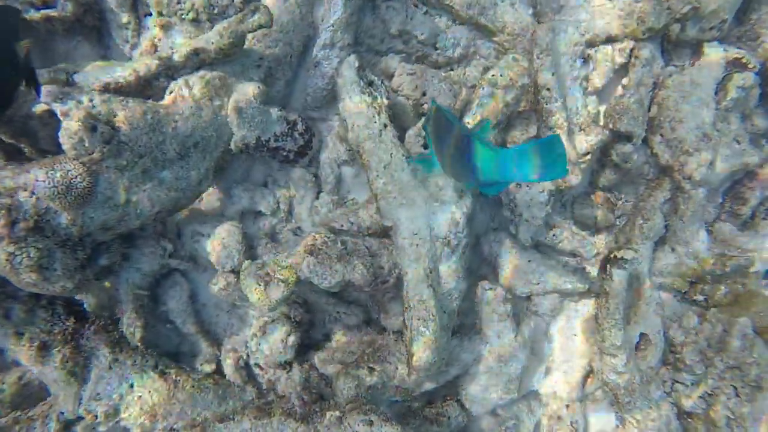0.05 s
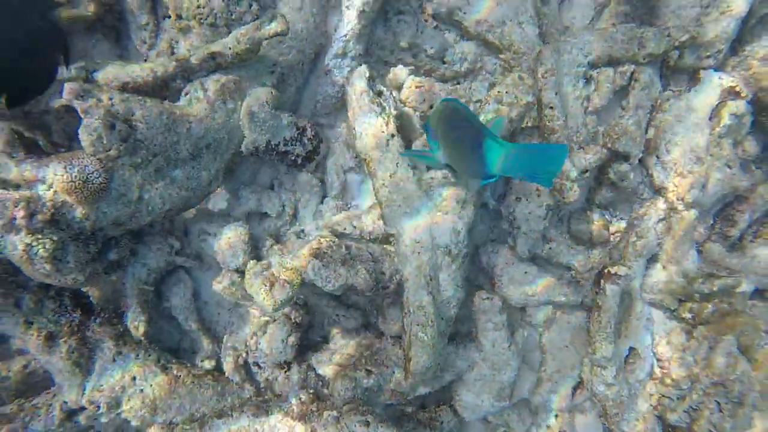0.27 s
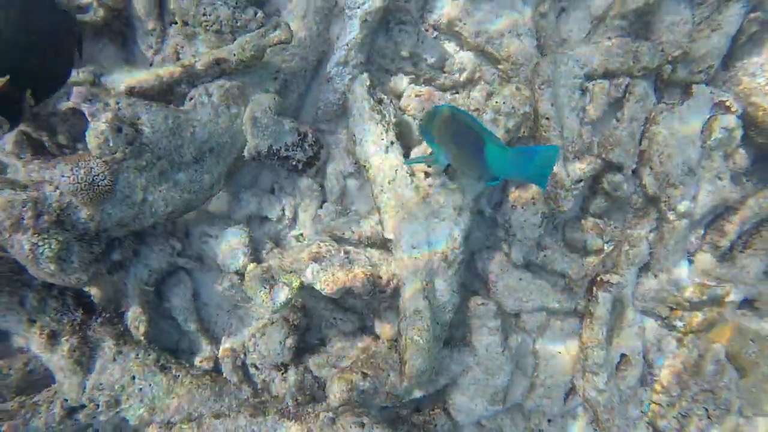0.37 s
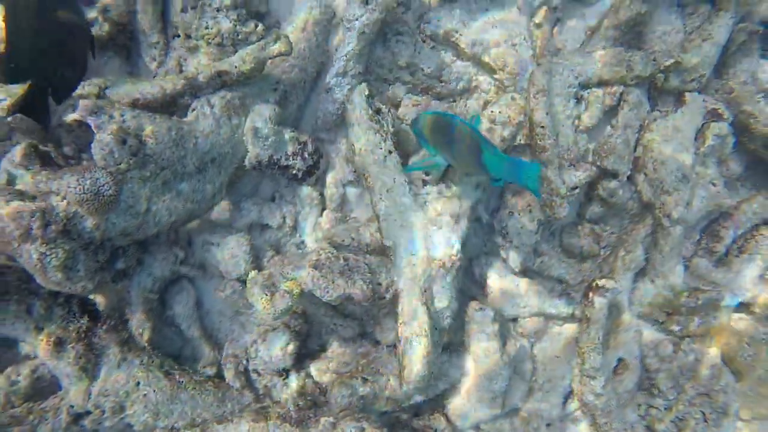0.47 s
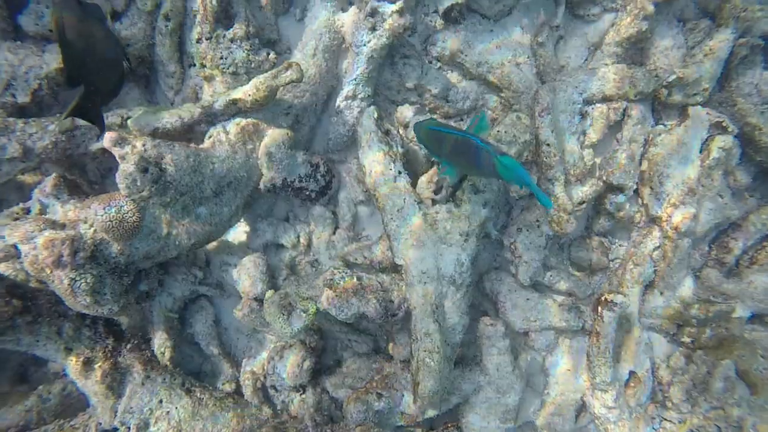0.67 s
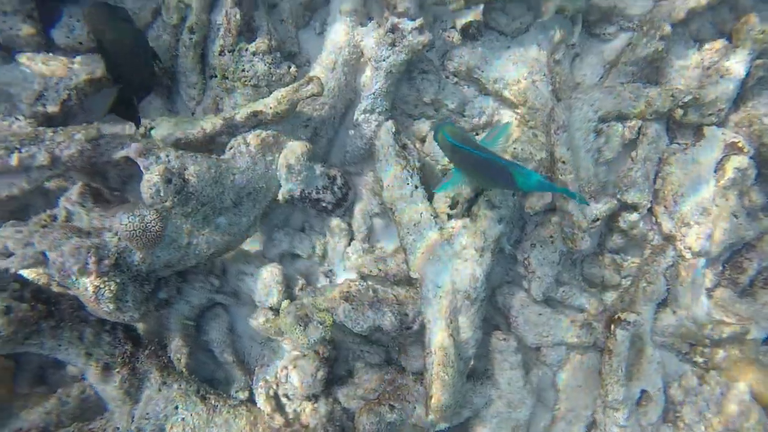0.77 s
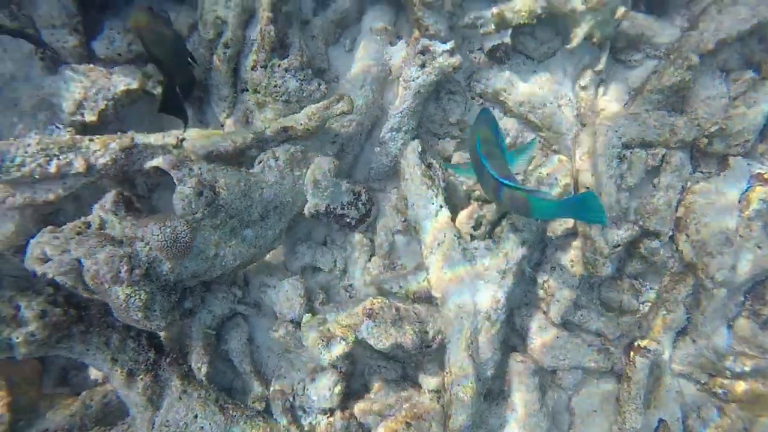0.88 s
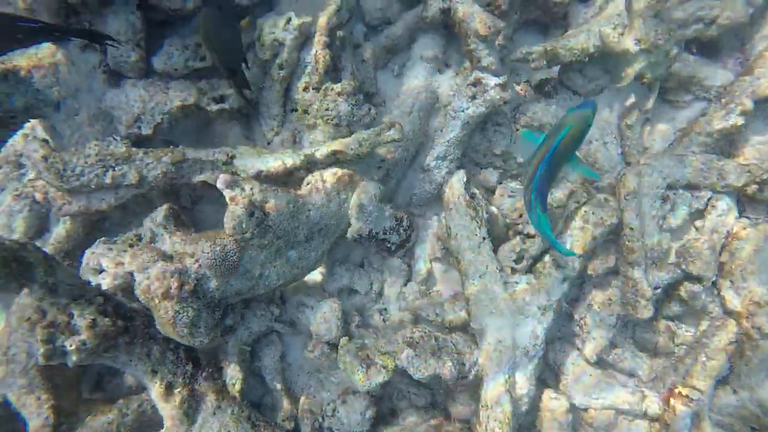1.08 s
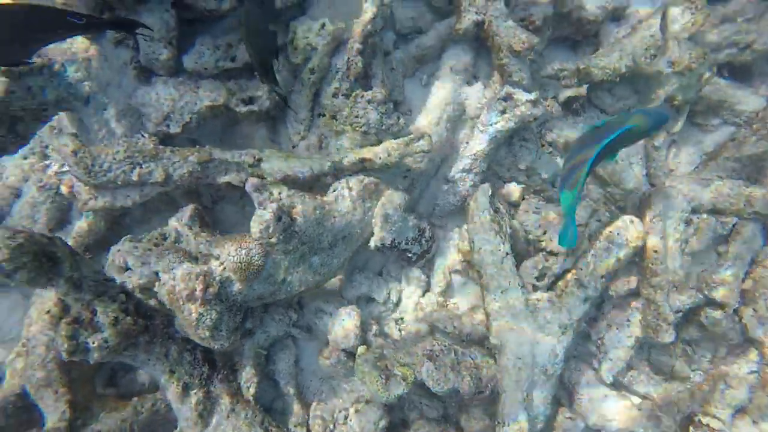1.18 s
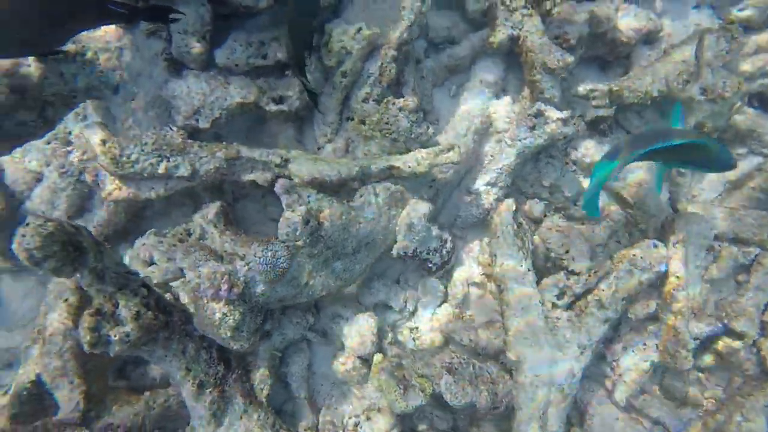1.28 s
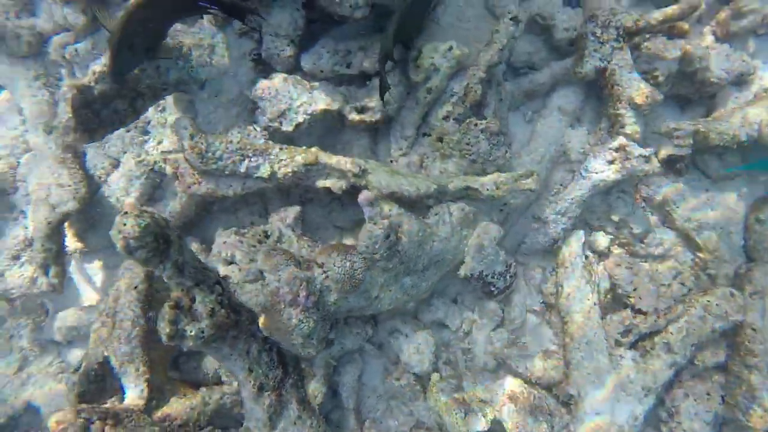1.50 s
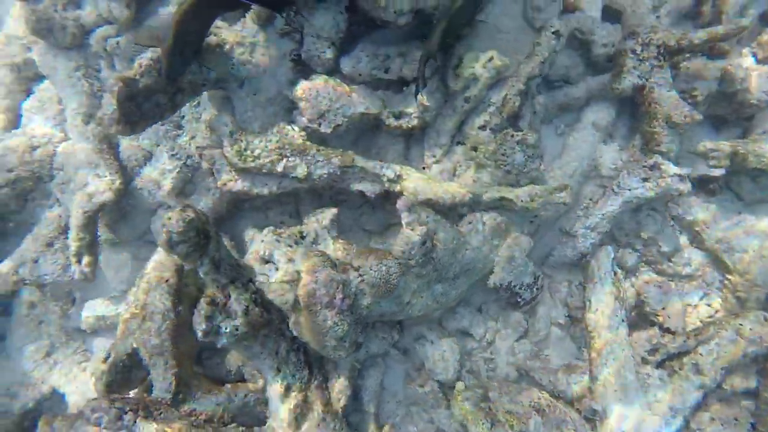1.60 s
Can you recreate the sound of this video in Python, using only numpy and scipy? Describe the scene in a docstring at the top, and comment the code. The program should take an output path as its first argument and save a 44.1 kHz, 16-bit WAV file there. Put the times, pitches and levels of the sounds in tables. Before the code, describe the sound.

A fish bites coral underwater with a quick, gritty run of cracks and scraping from about 0.1 to 0.3 seconds, sounding close and slightly hollow. At about 0.65 seconds a swirl of water bumps the camera housing with a low thump. A second, softer crunch comes around 1.3 to 1.4 seconds. Scattered small snaps, faint shrimp crackle and a soft water rumble continue throughout.

```python
"""Soft water rumble and the crackle of far shrimp, heard under water through a camera housing.
Nearer shrimp and grazing fish snap, each with a short ring. A parrotfish bites coral twice:
its beak scrapes off grains, and quick runs of brittle cracks ring the housing's hollow resonances.
Between the bites one swirl of water bumps the housing."""
import sys
import numpy as np
from scipy import signal
from scipy.fft import rfft, irfft
from scipy.io import wavfile

SR = 44100
rng = np.random.default_rng(int(sys.argv[2]) if len(sys.argv) > 2 else 0)


def unload_wav(signal):
    """Save mono or channel-first audio to the path in sys.argv[1] as 16-bit WAV at rate SR, clipped to [-1, 1]."""
    wavfile.write(
        sys.argv[1],
        SR,
        np.round(np.clip(np.atleast_2d(signal).T, -1, 1) * 32767).astype(np.int16),
    )


N = 72765
TAPS = 4096
HZ = np.fft.rfftfreq(TAPS, 1 / SR)
AGE_S = np.arange(TAPS) / SR

# water rumble and distant wash: (frequency [Hz], relative density [dB])
WATER_SPECTRUM = [(15, -18.5), (30, -2), (40, -2), (50, 5), (62, -9), (85, -9), (125, -14.5), (180, -11),
                  (260, -16), (420, -21.5), (650, -31), (1100, -40), (2000, -50), (16000, -62)]
# far shrimp: (frequency [Hz], relative density [dB])
REEF_SPECTRUM = [(100, -12.5), (400, 3.5), (680, 7.5), (1150, -3), (1450, 0), (1750, 4.5), (2250, -2),
                 (2800, -0.5), (3300, -5.5), (4200, -5.5), (5000, -12), (7000, -9.5), (10000, -18.5),
                 (13000, -18.5), (16000, -35)]
# thud, knock, clack, tick and fizz bands: (edge [Hz])
CLICK_BAND_EDGES_HZ = [110, 400, 1100, 2250, 5000, 16000]
# housing resonances: (frequency [Hz], half width [Hz], gain [dB])
HOUSING_MODES = [(240, 83, 4.5), (510, 89, -5), (620, 62, 3), (1649, 135, -8.5), (1900, 210, -17),
                 (2600, 230, -14.5), (2882, 102, -14), (3530, 80, -18.5), (4010, 280, -19.5),
                 (4660, 50, -34), (5100, 320, -27.5), (6020, 250, -37)]
# path through the housing wall: (frequency [Hz], gain [dB])
WALL_GAIN = [(30, -50), (120, -10), (400, -4.5), (780, -6), (1100, -54), (2300, -32.5), (5000, -39),
             (8000, -39.5), (12000, -49), (16000, -59)]
# near snaps: (time [s], ring [Hz], thud [dB], knock [dB], clack [dB], tick [dB], fizz [dB])
NEAR_SNAPS = [(0.0445, 1610, -48, -60, -48, -67, -73), (0.087, 2920, -48, -52, -59, -51, -74),
              (0.402, 650, -49.5, -45, -61, -78, -68), (0.4248, 2200, -48, -60, -46, -50, -53),
              (0.4881, 1560, -64, -50, -39, -49, -73), (0.498, 940, -59, -49, -56, -57, -67.5),
              (0.543, 1770, -82, -62, -52, -59, -82), (0.5527, 1950, -73, -67, -52, -60, -83),
              (0.574, 1900, -58, -69, -49, -60, -98), (0.59, 1900, -66, -66, -51, -57, -79),
              (0.642, 1335, -44, -53, -43, -53.5, -89), (0.6802, 1800, -45, -48, -45.5, -60, -64.5),
              (0.7901, 2820, -69, -68, -55.5, -57, -66), (0.812, 2800, -56.5, -79, -51.5, -49, -66),
              (0.8325, 3420, -70, -67, -54, -59, -63), (0.869, 900, -61, -53, -57, -62, -64),
              (0.923, 1960, -61, -76, -55.5, -60.5, -63.5), (0.9895, 2850, -54, -61, -54.5, -54.5, -72),
              (1.0005, 1730, -61, -50, -52.5, -65, -75), (1.0267, 1900, -57, -71, -51, -65, -68),
              (1.123, 1020, -59, -49.5, -45, -66, -68), (1.429, 9000, -72, -77, -79, -82, -70),
              (1.461, 10100, -67, -62, -69, -67, -70), (1.48, 2770, -51, -54.5, -62, -50, -64),
              (1.4897, 6160, -55.5, -46, -48.5, -45, -44.5), (1.5191, 1900, -54.5, -61, -49.5, -55.5, -72),
              (1.577, 1880, -71, -55, -50, -71, -78), (1.621, 5600, -81, -54, -59, -58, -58)]
# coral cracks: (time [s], knock lag [s], thud [dB], knock [dB], clack [dB], tick [dB], fizz [dB])
CORAL_CRACKS = [(0.0944, 0.0013, -38, -39, -51, -47.5, -61), (0.1032, 0.00028, -35.5, -56, -64, -72, -72),
                (0.1137, 0.001, -47, -45, -43.5, -50.5, -62), (0.1297, 0.00079, -44, -47.5, -48, -62, -81),
                (0.1352, 0.0013, -35.5, -35, -41.5, -45, -60),
                (0.1387, 0.00095, -19, -19.5, -29.5, -35.5, -41.5),
                (0.1447, 0.00015, -39, -32.5, -41, -34, -43), (0.169, 0.00056, -62, -43, -52, -45.5, -77),
                (0.174, 0.00059, -41.5, -34, -58, -70, -80),
                (0.2087, 0.00108, -43.5, -29.5, -35.5, -57, -51),
                (0.2179, 0.00034, -69, -51, -51, -41.5, -52),
                (0.229, 0.00108, -39.5, -30.5, -46.5, -53.5, -53.5),
                (0.272, 0.00042, -59, -47.5, -59.5, -64, -66), (1.2106, 0.00044, -47, -45, -54, -68, -82),
                (1.2665, 0.00032, -49.5, -45, -84, -58.5, -62.5),
                (1.3107, 0.00043, -55, -44, -49.5, -55, -70), (1.3187, 0.00029, -45, -53, -44, -52.5, -69),
                (1.339, 0.00088, -43, -33, -44.5, -71, -71),
                (1.3451, 0.00068, -36.5, -32.5, -53, -50, -57.5), (1.351, 0.00035, -40, -39, -45, -65, -59),
                (1.358, 0.00058, -52, -33.5, -44, -50, -50.5),
                (1.3692, 0.0011, -44.5, -33, -39.5, -50.5, -56.5),
                (1.3758, 0.0004, -44, -36, -47, -60, -72)]
# beak sliding on coral: (centre [s], half length [s], level [dB])
BEAK_SCRAPES = [(0.132, 0.024, -48), (0.216, 0.036, -46.5), (1.331, 0.047, -50.5)]
# churn in the swirl: (frequency [Hz], relative density [dB])
CHURN_SPECTRUM = [(30, 1), (90, -2), (160, 2), (300, -17), (600, -10.5), (1500, -31), (5000, -70)]
# ring of the bumped housing: (frequency [Hz], level [dB], t60 [s])
BUMP_MODES = [(97, -36.5, 0.18), (150, -30.5, .07), (276, -33, 0.14), (518, -32.5, 0.059),
              (950, -24.5, 0.014), (1266, -23, 0.015)]


def amp(db):
    """Decibels to gain."""
    return 10 ** (np.asarray(db) / 20)


def unit_rms(x):
    """Scale to an rms of one."""
    return x / np.sqrt(np.mean(x ** 2) + 1e-20)


def curve_gain(points, hz):
    """Gain of a (frequency [Hz], level [dB]) curve, log-frequency axis."""
    points_hz, db = np.transpose(points)
    return amp(np.interp(np.log(hz + 1), np.log(points_hz + 1), db))


def add(mix, time_s, sound):
    """Mix a sound in at time_s."""
    part = mix[max(round(time_s * SR), 0):][:len(sound)]
    part += sound[:len(part)]


def min_phase(gain):
    """Spectrum of the sharpest causal click with these gains."""
    log_gain = np.log(np.maximum(np.r_[gain, gain[-2:0:-1]], 1e-7))
    return np.exp(np.conj(signal.hilbert(log_gain)))[:len(gain)]


def noise(spectrum):
    """Steady shaped noise, unit rms."""
    gain = curve_gain(spectrum, np.fft.rfftfreq(N, 1 / SR))
    return unit_rms(irfft(rfft(rng.standard_normal(N)) * gain, N))


def water(level_db=-50.5, lump_db=1.5, lump_s=0.027):
    """Moving water rumbles in uneven lumps."""
    window = np.hanning(int(2 * lump_s * SR))
    lumps = unit_rms(signal.fftconvolve(rng.standard_normal(N), window, "same"))
    return amp(level_db) * unit_rms(noise(WATER_SPECTRUM) * amp(lump_db * lumps))


def far_shrimp(level_db=-56.5, wash_db=-59, snaps_per_s=700, spread_db=5,
               spots=32, patchy_db=4, smear_s=0.0031, dull_hz=7500):
    """Random snaps from many spots, each spot with its own colour, over a steady wash."""
    sizes = amp(spread_db * np.minimum(rng.exponential(1, N), 3))
    impulses = sizes * (rng.random(N) < snaps_per_s / SR)
    spot_of = rng.integers(0, spots, N)
    out = np.zeros(N)
    for spot in range(spots):
        spectrum = [(hz, db + patchy_db * rng.standard_normal()) for hz, db in REEF_SPECTRUM]
        colour = curve_gain(spectrum, HZ) / (1 + (HZ / dull_hz) ** 2)
        burst = rng.standard_normal(TAPS) * np.exp(-AGE_S / smear_s)
        snap = unit_rms(irfft(min_phase(colour) * rfft(burst)))
        out += signal.oaconvolve(impulses * (spot_of == spot), snap)[:N]
    return amp(level_db) * unit_rms(out) + amp(wash_db) * noise(REEF_SPECTRUM)


def housing(low_cut_hz=128):
    """Housing gain: hollow resonances plus what passes the wall."""
    mode_power = sum(amp(db) ** 2 / (1 + ((HZ - hz) / half_width_hz) ** 2) ** 2
                     for hz, half_width_hz, db in HOUSING_MODES)
    power = mode_power + curve_gain(WALL_GAIN, HZ) ** 2
    slope = (HZ / low_cut_hz) ** 6
    return np.sqrt(power * slope / (1 + slope))


def scatter(grit_db, grit_s, echo_db, echo_s, grit_above_hz):
    """Spectrum of an impulse trailed by a spray of grit and faint reef echoes."""
    tails = rng.standard_normal((2, TAPS)) * np.exp(-AGE_S / np.array([[grit_s], [echo_s]]))
    grit, echo = rfft(tails / np.linalg.norm(tails, axis=1, keepdims=True))
    highpass = (HZ / (HZ - 1j * grit_above_hz)) ** 2
    return 1 + amp(grit_db) * grit * highpass + amp(echo_db) * echo


def click(levels_db, body, impulse):
    """An impulse rings a body; band levels are rms over 10 ms."""
    power = abs(body * impulse) ** 2 * 2 / TAPS / (SR / 100)
    colour = []
    for db, low_hz, high_hz in zip(levels_db, CLICK_BAND_EDGES_HZ, CLICK_BAND_EDGES_HZ[1:]):
        gain_db = db - 10 * np.log10(power[(HZ >= low_hz) & (HZ < high_hz)].sum())
        colour += [(low_hz * 1.2, gain_db), (high_hz / 1.2, gain_db)]
    fade = np.cos(np.pi / 2 * AGE_S / AGE_S[-1]) ** 2
    return irfft(min_phase(body * curve_gain(colour, HZ)) * impulse) * fade


def near_snaps(ring_db=12, ring_width_ratio=0.12, housing_share=0.56, dull_hz=8500):
    """Shrimp and grazing fish snap nearby, each with its own short ring."""
    out = np.zeros(N)
    for time_s, ring_hz, *levels_db in NEAR_SNAPS:
        ring = 1 + amp(ring_db) / (1 + ((HZ / ring_hz - 1) / ring_width_ratio) ** 2)
        impulse = scatter(grit_db=16.5, grit_s=0.0028, echo_db=-5, echo_s=0.01, grit_above_hz=1170)
        body = housing() ** housing_share * ring / (1 + (HZ / dull_hz) ** 2)
        add(out, time_s, click(levels_db, body, impulse))
    return out


def coral_cracks(knock_below_hz=1840):
    """Coral gives way in gritty cracks, each trailed by the knock of the beak."""
    out = np.zeros(N)
    for time_s, lag_s, *levels_db in CORAL_CRACKS:
        # all-pass: lows arrive after the crisp onset
        lag = np.exp(-2j * np.pi * lag_s * knock_below_hz * np.arctan(HZ / knock_below_hz))
        impulse = scatter(grit_db=9, grit_s=0.0021, echo_db=-9.5, echo_s=0.006, grit_above_hz=1560)
        add(out, time_s, click(levels_db, housing(), lag * impulse))
    return out


def beak_scrapes(grains_per_s=900, spread_db=3):
    """The sliding beak breaks off tiny grains that ring the housing."""
    t = np.arange(N) / SR
    sizes = amp(spread_db * np.minimum(rng.exponential(1, N), 3)) * rng.choice([-1, 1], N)
    grains = sizes * (rng.random(N) < grains_per_s / SR)
    ring = irfft(min_phase(housing()))
    pressure = sum(amp(db) * np.exp(-((t - centre_s) / half_s) ** 4)
                   for centre_s, half_s, db in BEAK_SCRAPES)
    return pressure * unit_rms(signal.oaconvolve(grains, ring)[:N])


def swirl(swell_db=-27, peak_s=0.66, rise_s=0.012, fall_s=0.029, rock_hz=49,
          churn_db=-36, churn_sigma_s=0.017, bump_s=0.6415, bump_rise_s=0.00087):
    """Water churns, swells against the housing and bumps it."""
    t = np.arange(N) / SR
    swell = np.exp(-abs(t - peak_s) / np.where(t < peak_s, rise_s, fall_s))
    rocking = amp(swell_db) * swell * np.cos(2 * np.pi * rock_hz * (t - peak_s))
    churn = amp(churn_db) * noise(CHURN_SPECTRUM) * np.exp(-0.5 * ((t - bump_s) / churn_sigma_s) ** 2)
    ring = sum(amp(db - 60 * AGE_S / t60_s) * np.sin(2 * np.pi * hz * AGE_S)
               for hz, db, t60_s in BUMP_MODES)
    out = rocking + churn
    add(out, bump_s, ring * (1 - np.exp(-AGE_S / bump_rise_s)))
    return out


def scene():
    """Two bites, snaps and a swirl over crackle and rumble; mono."""
    bites = coral_cracks() + beak_scrapes()
    return (bites + near_snaps() + swirl() + far_shrimp() + water())[None]


def record(dry):
    """Recorder band limit."""
    cutoff_hz = 15600
    lowpass = signal.firwin(401, cutoff_hz, window=("kaiser", 9), fs=SR)
    return signal.oaconvolve(dry, lowpass[None], "same")


dry = scene()
out = record(dry)
unload_wav(out)
```